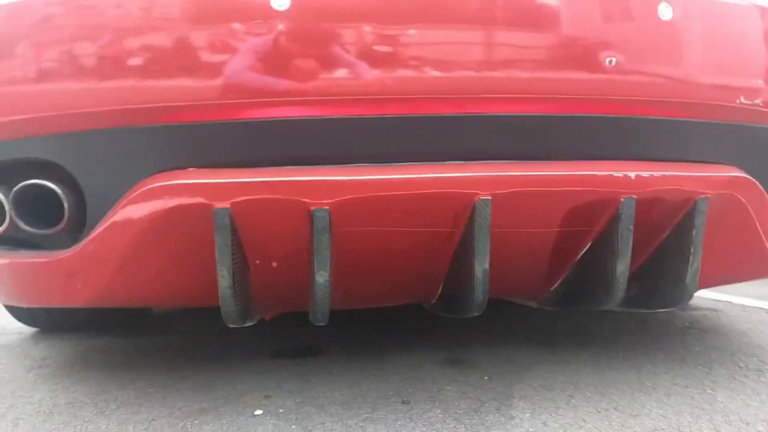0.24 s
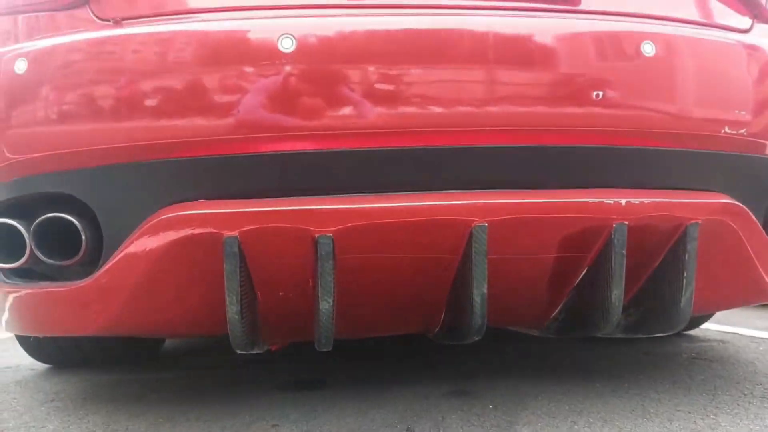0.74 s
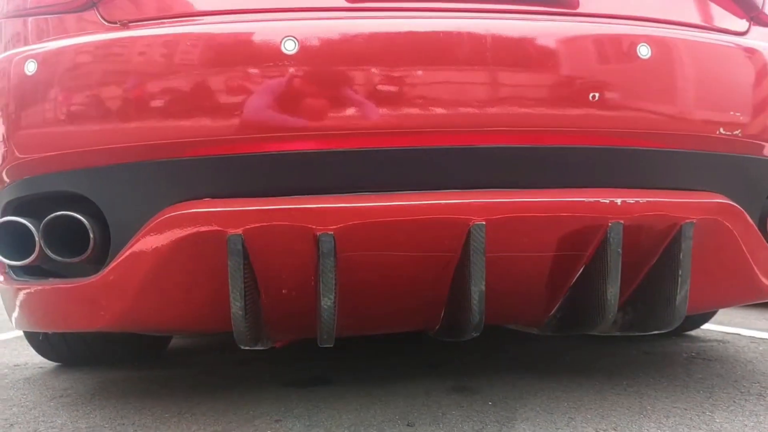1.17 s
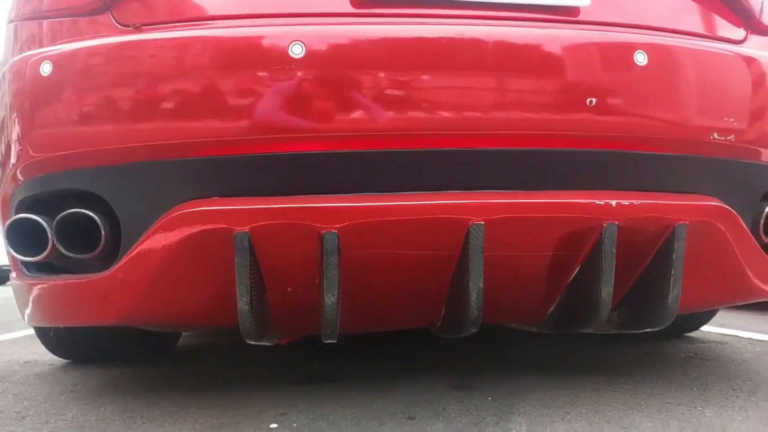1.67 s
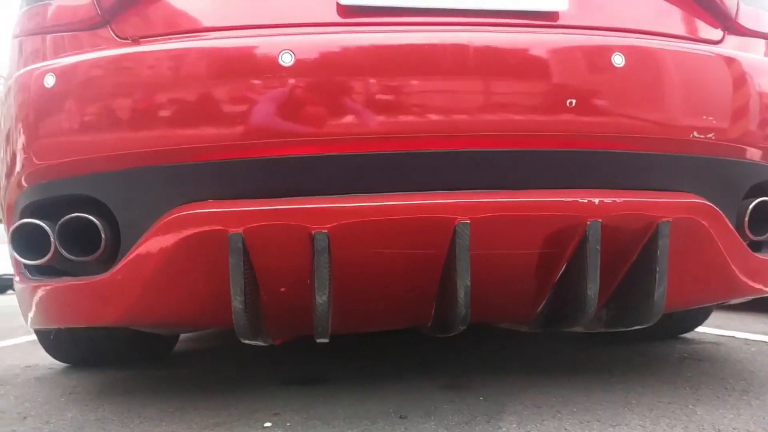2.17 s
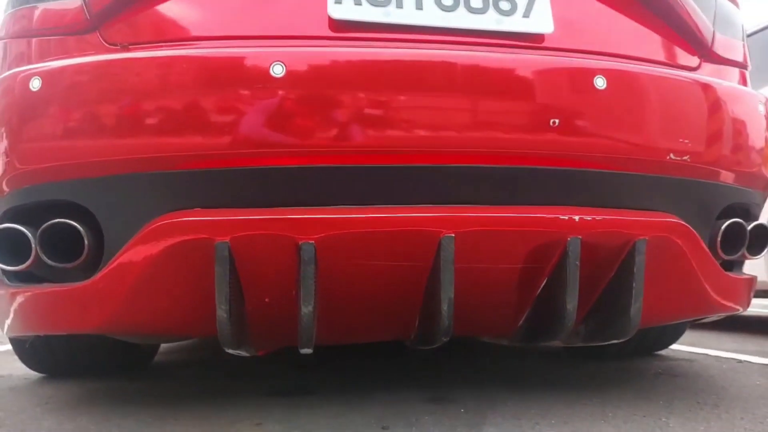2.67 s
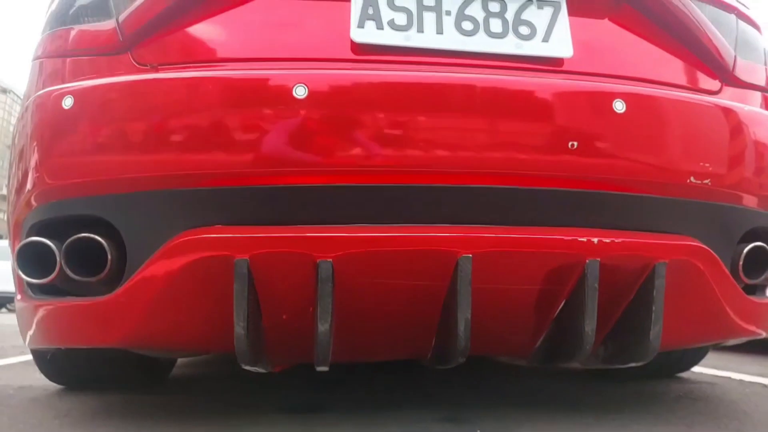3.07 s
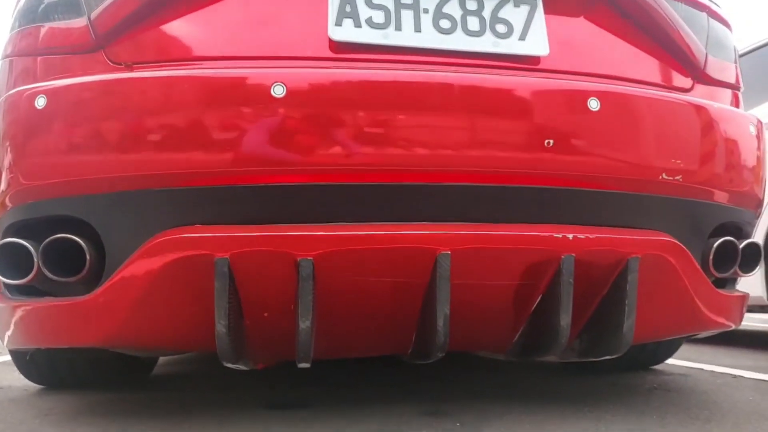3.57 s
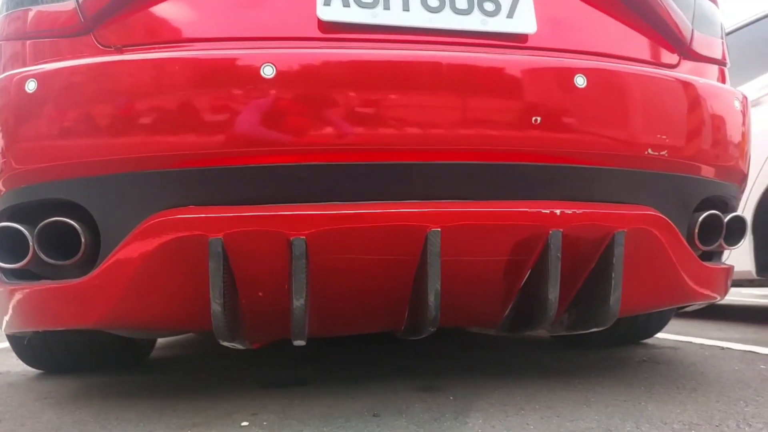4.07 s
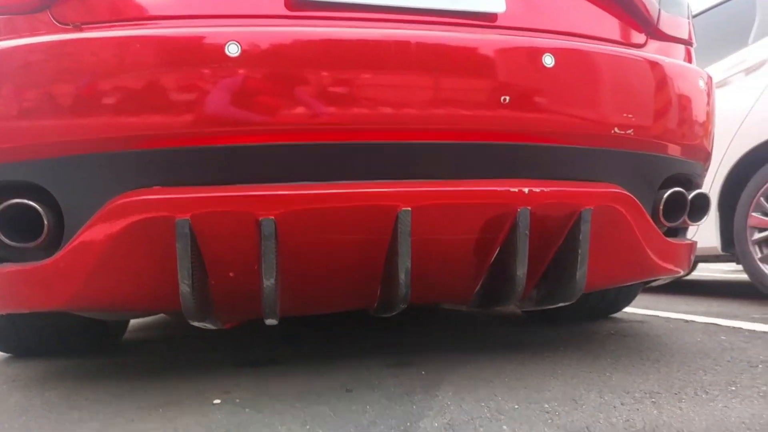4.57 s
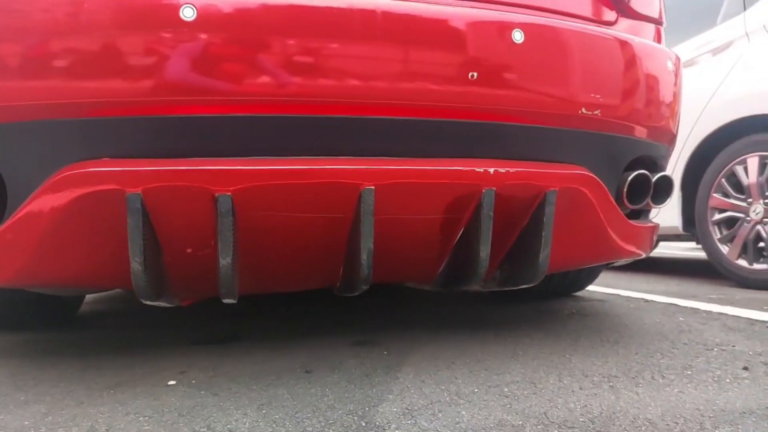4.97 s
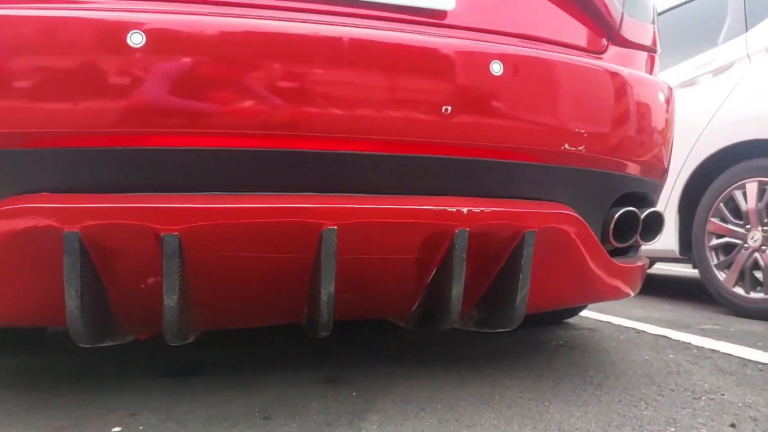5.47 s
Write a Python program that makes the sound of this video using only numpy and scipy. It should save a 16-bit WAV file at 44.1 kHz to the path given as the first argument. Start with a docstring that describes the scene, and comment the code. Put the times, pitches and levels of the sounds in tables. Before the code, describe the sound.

Close behind a sports car, rapid exhaust pops crackle and sputter over the low rumble of the idling engine, each with a brief echo off the surrounding parking lot. The dense opening volley breaks into looser bursts and peaks in a few hard bangs. Then the engine settles into a quieter, slightly slower idle, interrupted once more by a quick cluster of pops, with faint ticks and distant high squeaks around it.

```python
"""A sports car idles in an open parking lot, heard from low behind its rear bumper. From the start,
unburnt fuel explodes in the two tail pipes: each pop booms, barks and cracks, among thin ticks and
rough spits of burning gas, and all these echo off cars and walls. The loudest pops come between 2.5
and 3.3 seconds. Then the engine runs on, slowing a little, and near the end faint squeaks pass
around one last cluster of pops."""
import sys
import numpy as np
from scipy import signal
from scipy.fft import rfft, irfft, next_fast_len
from scipy.io import wavfile
from scipy.ndimage import map_coordinates

SR = 44100
rng = np.random.default_rng(int(sys.argv[2]) if len(sys.argv) > 2 else 0)


def waveform_to_disk(signal):
    """Save audio, clipped to [-1, 1], as 16-bit WAV at the path in sys.argv[1]."""
    frames = np.transpose(np.atleast_2d(signal))
    scaled = np.clip(frames, -1, 1) * 32767
    samples = np.round(scaled).astype(np.int16)
    wavfile.write(sys.argv[1], SR, samples)


N = 252693


def amp(db):
    """Turn decibels into a number to multiply by."""
    return 10 ** (np.asarray(db) / 20)

def unit(x):
    """Scale x to an average (rms) strength of 1."""
    return x / np.sqrt(np.mean(x ** 2) + 1e-20)

def along(points, hz):
    """Read between (frequency, value) points on a log frequency scale."""
    freqs, values = np.transpose(points)
    return np.interp(np.log(hz + 1), np.log(freqs + 1), values)

def curve(points):
    """Join (time, value) points with straight lines, one value per sample."""
    return np.interp(np.arange(N) / SR, *np.transpose(points))

def wobble(rate):
    """A smooth curve through `rate` random values a second."""
    return map_coordinates(rng.standard_normal(int(N * rate / SR) + 4), [np.arange(N) * rate / SR])

def filtered(x, response):
    """Multiply each frequency in x by response(frequency)."""
    size = next_fast_len(x.shape[-1] + 2048)
    return irfft(rfft(x, size) * response(np.fft.rfftfreq(size, 1 / SR)), size)[..., :x.shape[-1]]

def coloured(x, tone):
    """Shape x with (frequency, level) points, fading away beyond them."""
    return filtered(x, lambda hz: amp(along([(0, -120), *tone, (SR / 2, -120)], hz)))

def ring(ms, hz, fade_ms, swell_ms):
    """A note that swells in and dies away, losing 60 dB in fade_ms."""
    ms = np.maximum(ms, 0)
    return np.sin(2 * np.pi * hz * ms / 1000) * amp(-60 * ms / fade_ms) * (1 - np.exp(-ms / swell_ms))

def burst(ms, noise, tone, fade_ms):
    """A short puff of shaped noise with a peak of 1."""
    ms = np.maximum(ms, 0)
    puff = coloured(noise * (1 - np.exp(-ms / .5)) * amp(-60 * ms / fade_ms), tone)
    return puff / abs(puff).max()

# how alike left and right sound: (frequency [Hz], likeness [0 to 1])
LIKENESS = [(60, 0.9), (240, 1), (930, 0.77), (3670, 0.027), (14500, 0.01)]
def rush(tone, flutter_db, rate):
    """Rushing gas: fluttering stereo noise, alike on both sides only in the low notes."""
    pair = coloured(rng.standard_normal((2, N)), tone) * amp(flutter_db * wobble(rate))
    angle = lambda hz: np.arccos(np.clip(along(LIKENESS, hz), -1, 1)) / 2
    mid, side = filtered(pair, lambda hz: np.array([np.cos(angle(hz)), np.sin(angle(hz))]))
    return unit(np.array([mid + side, mid - side]))

# how fast the engine fires: (time [s], rate [Hz])
FIRING_RATE = [(0, 82.75), (1.1, 81.44), (2.6, 81.78), (3.3, 79.2), (4, 78.93), (4.7, 75.34), (5.73, 74.62)]
# loudness of the exhaust's rumble and hiss: (time [s], level [dB])
RUMBLE_LEVEL = [(0.0, -27), (0.17, -35), (0.32, -32), (0.54, -31.5), (0.69, -31.5), (0.94, -34),
                (1.29, -33.5), (2.06, -33), (2.31, -29), (2.41, -29.5), (2.55, -32), (3.64, -39.5),
                (4.23, -40.5), (4.69, -36), (5.73, -36.5)]
HISS_LEVEL = [(0, -65), (.15, -75), (2, -74.5), (2.6, -68), (3.2, -72), (3.6, -79), (4.5, -76.5),
              (5.73, -69)]
# tone of the silencer and of the low, middle and high gas noise: (frequency [Hz], relative level [dB])
SILENCER_TONE = [(25, -22), (60, -8), (80, 0), (160, -1), (240, -0.5), (320, -16), (500, -16.5),
                 (1000, -51), (2000, -56)]
RUMBLE_TONE = [(15, -39), (25, -6.5), (65, 3), (119, -3.5), (226, -7), (358, -13.5), (401, -11),
               (700, -28.5), (910, -46.5), (1540, -120)]
RASP_TONE = [(350, -12.5), (600, -3), (950, -2.5), (1300, -5.5), (1700, -14), (2600, -22), (3100, -32.5),
             (5000, -36), (6500, -44.5), (8500, -51), (10000, -85.5)]
SIZZLE_TONE = [(5000, -28), (8500, -14.5), (9600, -15), (12500, -3), (14100, -0.5), (14400, -31),
               (15000, -28)]
def engine():
    """Uneven firings beat through the silencer over rumbling gas; gas still burning adds rasp and hiss."""
    cycles = np.cumsum(curve(FIRING_RATE)) / SR
    fired = np.flatnonzero(np.diff(np.floor(cycles)))
    banks = 1 + 0.37 * (-1) ** np.arange(len(fired))  # the two rows of cylinders differ
    pulses = np.zeros(N)
    pulses[fired] = banks * amp(1.2 * rng.standard_normal(len(fired)))
    beat = amp(-4.5) * unit(coloured(pulses, SILENCER_TONE))
    rumble = (beat + rush(RUMBLE_TONE, flutter_db=1.5, rate=25)) * amp([[-.8], [.8]])
    puff = 1 + 0.061 * np.cos(2 * np.pi * cycles)  # one puff of gas per firing
    rasp = puff * rush(RASP_TONE, flutter_db=1, rate=51) * amp([[-1.5], [1.5]])
    hiss = rush(SIZZLE_TONE, flutter_db=.4, rate=40)
    rumble_db = curve(RUMBLE_LEVEL)
    rasp_db = rumble_db.mean() - 12 + 1.04 * (rumble_db - rumble_db.mean())  # quieter, swings wider
    left, right = amp(rumble_db) * rumble + amp(rasp_db) * rasp + amp(curve(HISS_LEVEL)) * hiss
    return np.array([left, np.roll(right, 17)])  # the left side hears the engine first

# spits of burning gas: (time [s], length [s], rasp level [dB], hiss level [dB])
GAS_SPITS = [(0.017, 0.065, -34.5, -67), (0.162, 0.033, -38.5, -65), (0.285, 0.071, -46.5, -70.5),
             (0.201, 0.036, -38.5, -62), (0.244, 0.027, -36, -59), (0.481, 0.067, -38.5, -66),
             (0.64, 0.046, -47, -72), (0.86, 0.051, -39.5, -66), (1.261, 0.058, -42.5, -71),
             (1.318, 0.048, -49, -79), (1.553, 0.056, -44.5, -68), (1.639, 0.061, -44, -75),
             (2.103, 0.081, -42, -67), (2.253, 0.093, -42.5, -72), (2.487, 0.062, -33, -65),
             (2.601, 0.056, -46.5, -56), (2.792, 0.12, -46.5, -62), (3.001, 0.044, -39.5, -71.5),
             (3.148, 0.056, -41, -53.5), (3.233, 0.036, -43, -57), (3.288, 0.057, -43.5, -67),
             (4.498, 0.049, -62, -78), (4.614, 0.08, -59, -76)]
# tone of a spit, and of each pipe's crack (right, then left): (frequency [Hz], relative level [dB])
SPIT_TONE = [(150, -30), (280, -1.5), (450, -4.5), (700, 2.5), (1200, -2.5), (2200, -13), (3300, -19),
             (6000, -29.5), (8500, -41.5)]
CRACK_TONES = [
    [(1000, -24.5), (1800, 5), (2200, -5.5), (2700, 4), (3400, 0), (5500, -17), (8000, -38)],
    [(1000, -13), (2000, 9), (2500, -6), (3200, 0), (4200, -17), (5500, -14), (8000, -24.5)],
]
def spits():
    """Gas burns on in the pipe: rough noise that starts fast, holds and fades."""
    t, rasp, hiss = np.arange(N) / SR, np.zeros(N), np.zeros(N)
    for start, length, rasp_db, hiss_db in GAS_SPITS:
        flame = np.clip(np.minimum((t - start) / 0.0018, (start + length - t) / 0.021), 0, 1)
        rasp += amp(rasp_db) * flame
        hiss += amp(hiss_db) * flame
    sparks = (rng.random((2, N)) < 250 / SR) * rng.standard_normal((2, N))  # tiny droplets flash
    rough = rush(SPIT_TONE, flutter_db=3.5, rate=220) + amp(-13) * unit(coloured(sparks, CRACK_TONES[0]))
    return rasp * rough * amp([[-1.5], [1.5]]) + hiss * rush(SIZZLE_TONE, flutter_db=2, rate=120)

LEAD = 200  # samples of room before each tick or pop
CLOCK_MS = (np.arange(1800) - LEAD) * 1000 / SR  # time since it began
# thin ticks: (time [s], crack level [dB], sizzle level [dB])
THIN_TICKS = [(0.0194, -24.5, -61), (0.118, -24, -41), (0.2068, -26.5, -59), (0.564, -30, -58),
              (0.8186, -39, -55), (0.9556, -30, -40), (1.255, -38, -63), (1.4436, -42, -67),
              (2.3554, -34.5, -75), (2.5837, -34, -61), (2.601, -47, -46), (2.6196, -26, -32),
              (2.6474, -45, -50), (2.679, -41, -44.5), (2.793, -42.5, -67), (3.15, -34.5, -52),
              (3.163, -41, -33.5), (4.981, -49, -62), (5.209, -43, -55), (5.468, -49, -52),
              (5.489, -49, -44), (5.54, -44, -48.5)]
def ticks():
    """A small crack and a high sizzle, with no boom."""
    out = np.zeros((2, N + SR))
    for start, crack_db, sizzle_db in THIN_TICKS:
        for ear in range(2):
            noise = rng.standard_normal(len(CLOCK_MS))
            crack = amp(crack_db) * burst(CLOCK_MS, noise, CRACK_TONES[0], fade_ms=12.5)
            sizzle = amp(sizzle_db) * burst(CLOCK_MS, noise, SIZZLE_TONE, fade_ms=22)
            out[ear, round(start * SR):][:len(noise)] += crack + sizzle
    return out[:, LEAD:LEAD + N]

# explosions: (time [s], pipe [0 right, 1 left], boom [dB], bark [dB], crack [dB]), scaled by shapes below
EXPLOSIONS = [(0.0302, 0, -13.5, -12, -29), (0.0381, 0, -10.5, -34.0, -47), (0.0525, 0, -30, -16, -40.0),
              (0.0637, 0, -24.0, -12.5, -24), (0.0684, 1, -7.5, -37.0, -38), (0.1026, 0, -8.5, -12.0, -22),
              (0.1246, 0, -9, -11, -19), (0.1507, 0, -8.5, -14, -28), (0.1686, 0, -10, -14.5, -24),
              (0.1748, 0, -13.5, -19.5, -25.5), (0.18, 1, -7, -22, -31.0), (0.2106, 0, -10, -14, -39.0),
              (0.2469, 0, -9.0, -15, -32), (0.2559, 0, -11.5, -16, -25.5), (0.2893, 0, -15.5, -19, -28.5),
              (0.2955, 0, -13.5, -20.5, -31), (0.3231, 0, -20.5, -21, -27.5), (0.3385, 0, -20.5, -23, -33),
              (0.4762, 0, -15, -27, -31), (0.4843, 0, -14.5, -22.5, -33), (0.4896, 0, -15, -29, -34),
              (0.524, 0, -14, -19.5, -30.0), (0.5564, 1, -16, -22, -49), (0.5676, 0, -14, -13.5, -42),
              (0.5936, 0, -9.5, -16.5, -23), (0.5999, 1, -16, -20.5, -42), (0.6369, 0, -18, -15, -24.5),
              (0.65, 0, -8, -12.5, -23), (0.6706, 0, -10, -14.5, -26.0), (0.6796, 0, -8.5, -9.5, -24.5),
              (0.727, 0, -13.5, -17, -29), (0.7385, 0, -13, -16.5, -29.5), (0.8043, 0, -14, -19, -29.5),
              (0.8444, 0, -10.5, -17.5, -27.5), (0.8738, 0, -16.5, -21, -29.5), (0.885, 0, -20.5, -22, -29),
              (0.8903, 1, -9, -14.5, -41), (0.9773, 0, -7, -13.5, -23.5), (1.2249, 1, -18, -29, -58),
              (1.274, 0, -12, -18, -28.5), (1.2853, 0, -14.5, -18, -29), (1.3357, 1, -15.0, -32, -52),
              (1.4692, 0, -13.5, -19.0, -25), (1.4955, 0, -11.5, -17, -22), (1.5648, 0, -12, -18.5, -31.5),
              (1.5873, 0, -9.5, -17.5, -34.0), (1.7147, 1, -14.5, -14.5, -38.0),
              (1.7315, 1, -12.5, -23, -31.5), (1.7533, 1, -18.5, -19.5, -39.5), (1.885, 0, -31, -26, -53),
              (1.9625, 1, -18.5, -26, -49), (2.1046, 0, -15.5, -24.5, -39), (2.114, 0, -16.5, -18.5, -31.5),
              (2.1227, 0, -14.5, -19.5, -36), (2.1604, 1, -18, -38, -48.5), (2.166, 1, -15, -41, -42.5),
              (2.1876, 0, -14.5, -21.5, -30.0), (2.2142, 0, -16, -21.5, -34.5),
              (2.2417, 0, -13, -18.5, -37), (2.2743, 0, -15.5, -15, -46), (2.2978, 0, -16.5, -18.5, -32),
              (2.3115, 1, -19, -39, -52), (2.4819, 1, -1, -14.0, -32), (2.536, 1, -14, -19, -38),
              (2.567, 1, -4.5, -6, -18.5), (2.5788, 1, -5.5, -6.0, -16.5), (2.8152, 1, -15.5, -18, -28),
              (2.8398, 0, -21, -29, -32.5), (2.9417, 1, -20.5, -26.5, -43.0), (2.9984, 1, -1.5, -8.5, -28),
              (3.1795, 1, -11.5, -16, -24.0), (3.2125, 1, -10.5, -20.0, -35.5),
              (3.2353, 0, -12.5, -24, -46), (3.2406, 1, -0.0, -14.5, -38), (3.254, 1, -11.0, -29, -44),
              (3.2818, 1, -23, -22, -45), (3.3108, 1, -15, -24, -38), (3.4959, 1, -15.5, -26, -52),
              (4.6573, 1, -8.0, -15, -29), (4.704, 1, -13.5, -32, -44), (4.7126, 1, -6.5, -12, -26)]
# Shapes go by pipe, then by ear (left, right). A negative size flips the wave.
# the pipe's boom and its end's hard bark: (delay [ms], pitch [Hz], size [factor], fade [ms])
BOOM_SHAPES = [
    [(1, 315, 8, 13.7), (.9, 280, 2.9, 30)],
    [(-.2, 272, -3.7, 19.7), (.6, 267, -9, 14.5)],
]
BARK_SHAPES = [
    [(1.2, 570, -1.2, 5.5), (.7, 570, 3.7, 6.5)],
    [(-.5, 550, -.4, 9.5), (.68, 730, 1.45, 19.5)],
]
# the silencer's low thump: (delay [ms], size [factor])
THUMP_SHAPES = [
    [(5.3, .3), (.25, -.85)],
    [(-1.2, .18), (1.1, .2)],
]
# the shock wave's sharp edge: (delay [ms], gain [dB])
SHOCK_SHAPES = [
    [(1.8, -7), (0.37, 2.5)],
    [(-.5, 4), (.3, -4.5)],
]
# level of the shock's high snap, per pipe: (base [dB], share of boom [dB/dB], share of crack [dB/dB])
SNAP_RULE = [(-9, 1.51, 0.43), (-36.5, 0, 0.4)]
# tone of that snap: (frequency [Hz], relative level [dB])
SNAP_TONE = [(5000, -35), (7500, -19), (8600, -21.5), (9600, -5.5), (12500, -1), (13900, -2), (14500, -17),
             (15000, -29)]
def pops(small_pops):
    """Each explosion rings its pipe and sounds a little different, in timing and tone, left and right."""
    out, ms = np.zeros((2, N + SR)), CLOCK_MS
    for start, pipe, boom_db, bark_db, crack_db in list(EXPLOSIONS) + small_pops:
        pipe = round(pipe)
        heat = 1 + .045 * rng.standard_normal()  # hotter gas rings higher
        snap_db = np.dot(SNAP_RULE[pipe], [1, boom_db, crack_db])
        shock = rng.standard_normal(len(ms))  # shared by both ears
        for ear in range(2):
            delay, hz, size, fade_ms = BOOM_SHAPES[pipe][ear]
            boom = size * ring(ms - delay, hz * heat, fade_ms, swell_ms=6)
            delay, size = THUMP_SHAPES[pipe][ear]
            thump = size * ring(ms - delay, hz=111, fade_ms=43.4, swell_ms=.3)
            delay, hz, size, fade_ms = BARK_SHAPES[pipe][ear]
            overtone = amp(-20.5) * ring(ms - delay, hz=1220 * heat, fade_ms=21.3, swell_ms=1)
            bark = size * (ring(ms - delay, hz * heat, fade_ms, swell_ms=.2) + overtone)
            delay, side_db = SHOCK_SHAPES[pipe][ear]
            noise = np.roll(shock, round(delay * SR / 1000)) + .5 * rng.standard_normal(len(ms))
            crack = amp(crack_db) * burst(ms - delay, noise, CRACK_TONES[pipe], fade_ms=5.5)
            snap = amp(snap_db) * burst(ms - delay, noise, SNAP_TONE, fade_ms=5)
            pop = amp(boom_db) * (boom + thump) + amp(bark_db) * bark + amp(side_db) * (crack + snap)
            out[ear, round(start * SR):][:len(ms)] += pop
    return out[:, LEAD:LEAD + N]

def sputter(per_second=22, spread_db=4):
    """List small pops at chance moments while gas spits, as rows like those of EXPLOSIONS."""
    slots = np.arange(0, N / SR, 1 / per_second)
    times = slots + rng.random(len(slots)) / per_second
    pipes = rng.integers(2, size=len(slots))
    over_rasp_db = rng.normal([22, 15.5, -4.5], spread_db, (len(slots), 3))  # boom, bark, crack
    return [(times[k], pipes[k], *(rasp_db + over_rasp_db[k]))
            for start, length, rasp_db, _ in GAS_SPITS
            for k in np.flatnonzero((times > start) & (times < start + length))]

# how long the parking lot echoes: (frequency [Hz], time to fade 60 dB [s])
ECHO_FADE = [(100, 0.28), (1000, 0.093), (8000, 0.24)]
def lot_echo(sound):
    """Cars and walls scatter the sound back; each frequency dies at its own speed."""
    hz, t, spectrum = signal.stft(rng.standard_normal((2, SR // 3)), SR, nperseg=256)
    fade = amp(-60 * t / along(ECHO_FADE, hz)[:, None])
    _, tail = signal.istft(spectrum * fade, SR, nperseg=256)
    tail = np.pad(tail, ((0, 0), (350, 0)))  # the nearest cars are a few metres off
    return signal.fftconvolve(sound, tail / np.linalg.norm(tail[0]), axes=1)[:, :N]

# far-off squeaks: (time [s], length [s], pitch [Hz], level [dB])
FAR_SQUEAKS = [(4.116, 0.058, 3780, -75), (4.624, 0.07, 3170, -56), (5.045, 0.049, 3880, -62.5),
               (5.082, 0.072, 4200, -63.5), (5.136, 0.14, 3720, -69)]
def squeaks():
    """Faint, raspy high notes that swell and fade."""
    t, rough = np.arange(N) / SR, wobble(750)
    out = np.zeros(N)
    for start, length, hz, db in FAR_SQUEAKS:
        swell = np.sin(np.pi * np.clip((t - start) / length, 0, 1))
        out += amp(db) * swell * rough * np.sin(2 * np.pi * hz * t)
    return out

def scene():
    """The engine, the exhaust's bangs with their echo, and the squeaks."""
    bangs = pops(sputter()) + ticks() + spits()
    return engine() + bangs + amp(-17.5) * lot_echo(bangs) + squeaks()

def record(dry):
    """The microphone thins the deepest bass, rounds off loud peaks and drops the highest treble."""
    bass_hz, top_hz = 45, 15073
    thinned = filtered(dry, lambda hz: hz ** 3 / (hz ** 3 + bass_hz ** 3))
    rounded = thinned / (1 + abs(thinned) ** 12) ** (1 / 12)
    return filtered(rounded, lambda hz: hz < top_hz)


dry = scene()
out = record(dry)
waveform_to_disk(out)
```